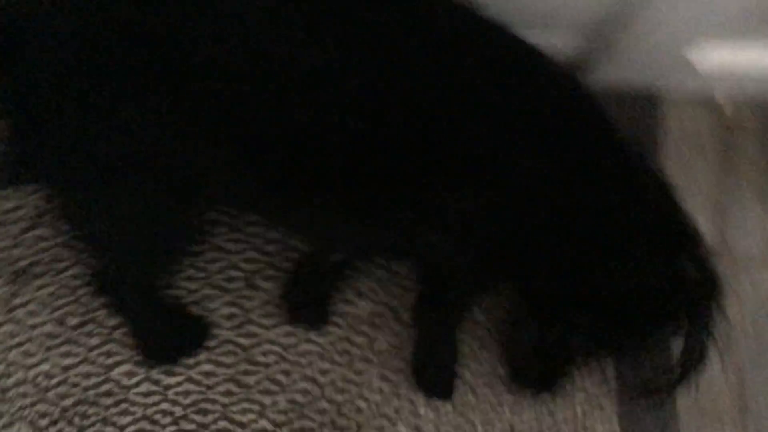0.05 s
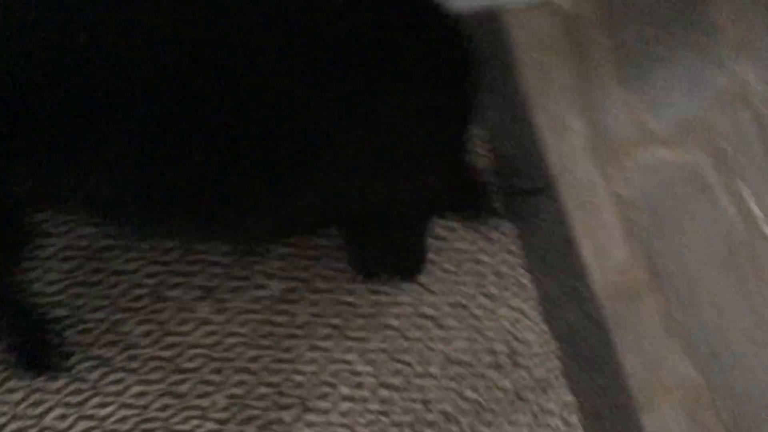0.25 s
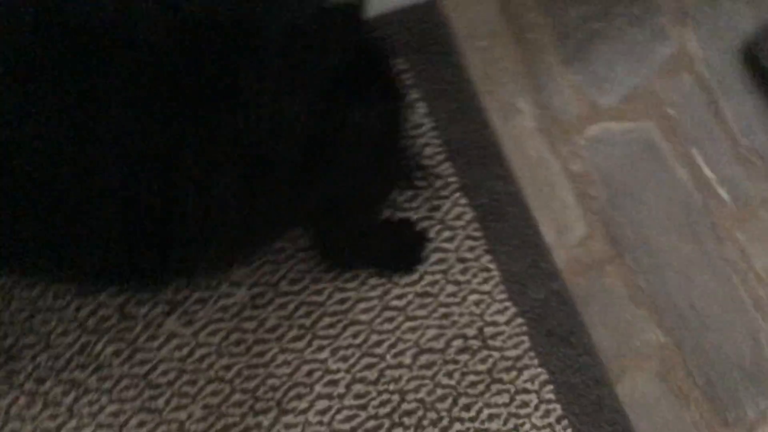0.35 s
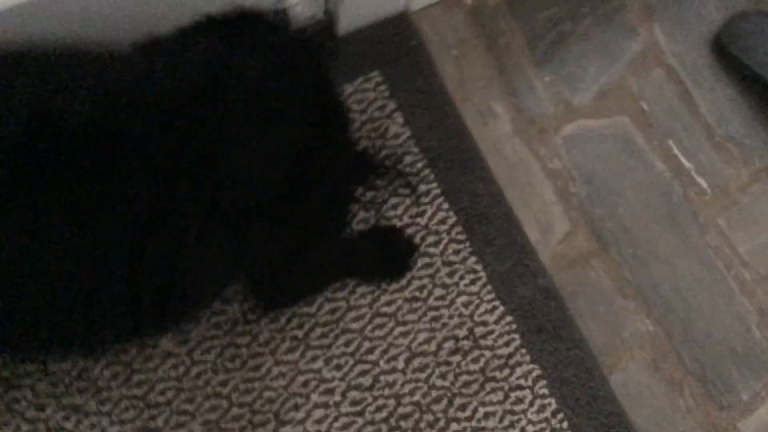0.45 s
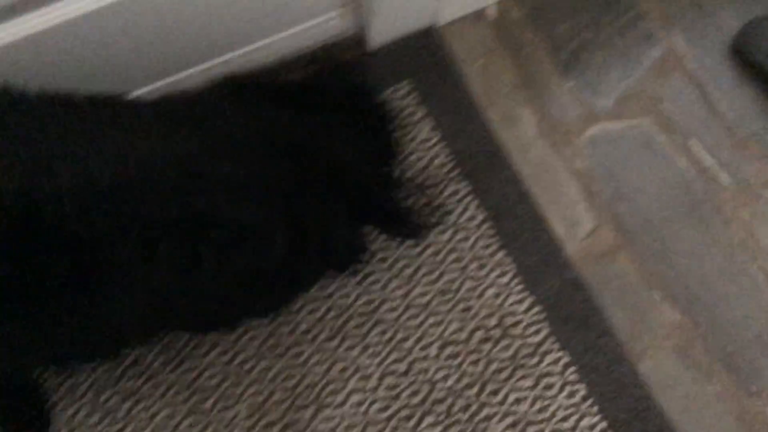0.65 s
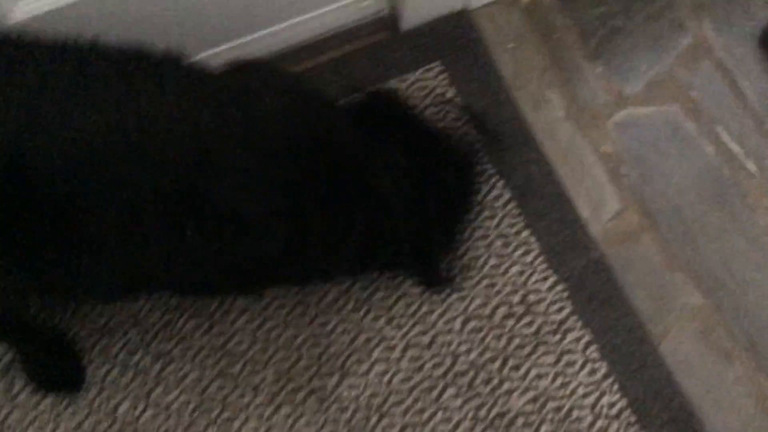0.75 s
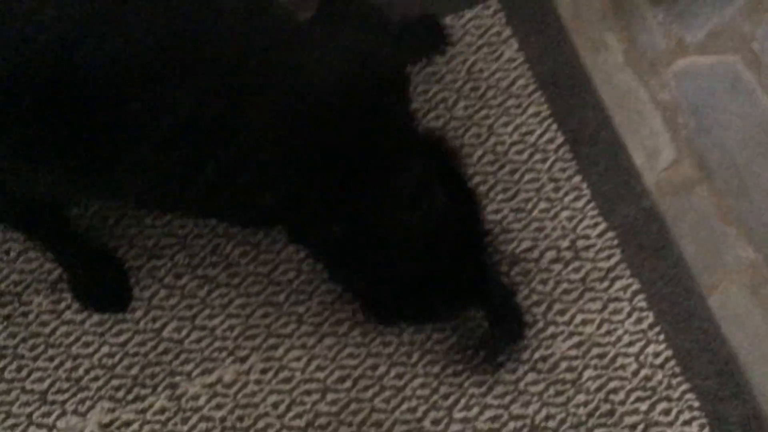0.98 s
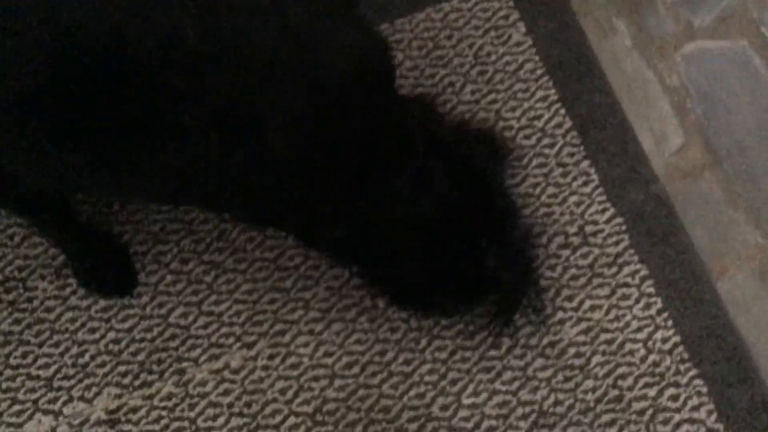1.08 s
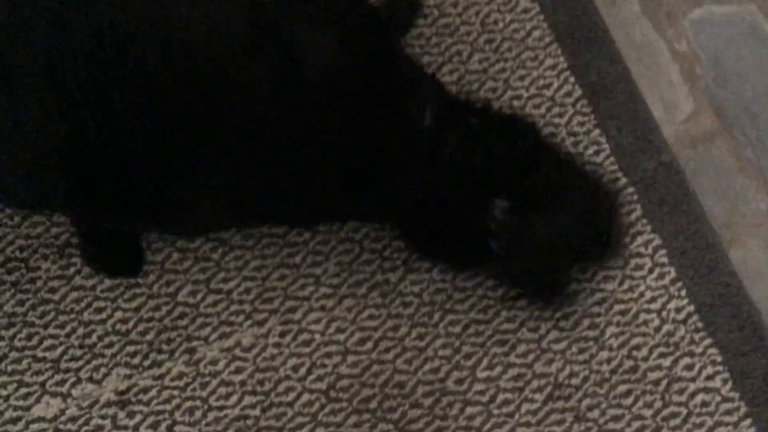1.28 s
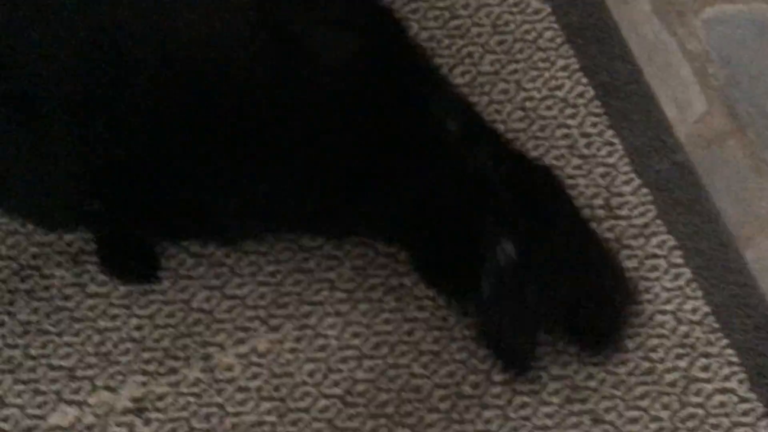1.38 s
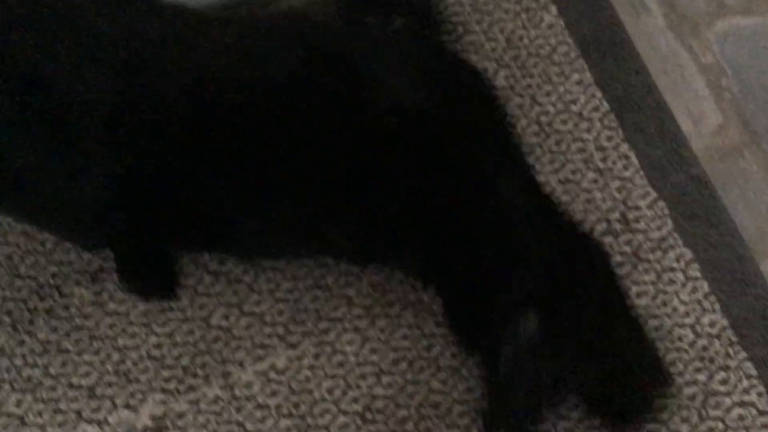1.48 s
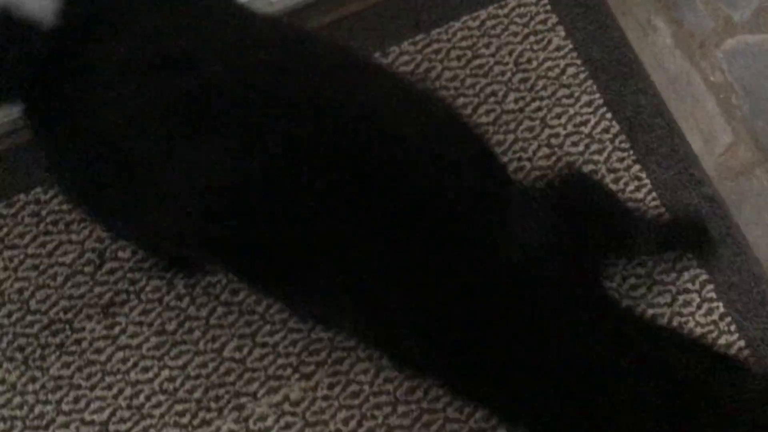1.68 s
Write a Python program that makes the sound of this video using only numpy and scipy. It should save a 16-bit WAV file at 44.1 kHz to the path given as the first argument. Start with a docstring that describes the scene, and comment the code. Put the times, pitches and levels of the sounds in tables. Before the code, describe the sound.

A wet dog rolls and rubs on a rug, thumping the floor once and snorting twice

```python
"""A small hard-walled room with a rug: a wet dog throws itself about on it. It knocks against a door or cabinet
with a hollow thump: decaying noise for the knock, decaying sines for the ringing wood. The coat drags and the
body rolls as filtered random clicks; claws catch as short snaps. It blows air through its nose and snorts
twice: shaped grains, with a noise pop opening each snort. Paws fall softly, wet fur swishes and one tick sounds
in narrow noise bands, over a low, hissy room noise."""
import sys
import numpy as np
from scipy import signal
from scipy.io import wavfile

SR = 44100
rng = np.random.default_rng(int(sys.argv[2]) if len(sys.argv) > 2 else 0)


def generate_wav(signal):
    """Clip the signal to [-1, 1] and save it as 16-bit WAV at the path in sys.argv[1]."""
    frames = np.transpose(np.atleast_2d(signal))
    scaled = np.clip(frames, -1, 1) * 32767
    pcm = np.round(scaled).astype(np.int16)
    wavfile.write(sys.argv[1], SR, pcm)


N = 74970
T = np.arange(N) / SR

# Room noise floor. Each row: frequency in Hz, relative level in dB.
QUIET_SPECTRUM = [(25, -33), (45, -11), (68, 13.5), (100, 2), (170, 0.5), (400, -11.5), (1000, -22.5),
                  (2400, -7), (3300, -15), (5300, -8.5), (7500, -28.5), (11000, -34), (16000, -34.5)]
# Early reflections. Each row: delay in seconds, gain before the source's own early factor.
ECHOES = [(.0024, .7), (.0052, 0.25), (.0087, 0.74), (.0112, .35), (0.0115, .7), (.0166, 0.79),
          (.019, 0.26)]
# Room decay. Each row: frequency in Hz, t60 in seconds.
ROOM_T60 = [(80, 1), (250, 0.74), (1000, 0.49), (2500, .42), (5000, 0.38), (9000, 0.38), (16000, 0.2)]
# Swishes of wet fur, and a last brief tick.
# Each row: start in seconds, length in seconds, level in dB, centre in Hz, glide in Hz/s.
SWISHES_AND_TICK = [(0.261, 0.013, -49.5, 5520, -5), (0.359, .17, -58, 5530, 1504),
                    (0.595, 0.057, -64.5, 5240, -5), (1.4505, 0.0036, -40.5, 3897, -7)]
# Soft falls of paws and shoulder. Each row: start in seconds, level in dB before doubling, pitch in Hz.
PADS = [(0.105, -52, 68), (0.214, -38.5, 68), (1.153, -44, 126.2), (1.332, -45.5, 84.6),
        (1.463, -45.5, 184.5)]
# Paws scuffing the pile. Each row: start in seconds, level in dB, centre in Hz, fade in seconds.
SCUFFS = [(0.379, -50.5, 556, 0.0075), (0.483, -57, 760, 0.024), (0.787, -46.5, 790, 0.017),
          (0.951, -48, 463, 0.014), (1.164, -50, 639, 0.0089), (1.323, -50.5, 660, 0.028)]
# Coat dragged over the rug. Each row: time in seconds, level in dB.
RUB_LEVEL = [(0, -66.5), (.21, -72), (.25, -53), (.33, -63.5), (.38, -63), (.44, -71), (.495, -57.5),
             (.56, -86), (.65, -68), (.72, -55.5), (.76, -55), (.805, -54), (.85, -64), (.93, -67),
             (.96, -52), (1.05, -62.5), (1.12, -53.5), (1.165, -53), (1.25, -67), (1.7, -68.5)]
# Fur on weave. Each row: frequency in Hz, relative level in dB.
COAT_SPECTRUM = [(100, -26), (300, -3.5), (500, -0.5), (750, 1), (1050, -1.5), (1500, -0.5), (2400, 2.5),
                 (3300, -9), (5500, -4.5), (7300, -27), (9000, -18), (11500, -43), (16000, -47)]
# Weight rolling over the boards. Each row: time in seconds, level in dB.
ROLL_LEVEL = [(0, -72.5), (.2, -74), (.27, -64), (.38, -53), (.48, -56.5), (.6, -70.5), (.68, -61.5),
              (.745, -49), (.82, -55.5), (.9, -81), (.98, -65), (1.07, -66), (1.17, -50), (1.26, -92),
              (1.34, -54), (1.43, -69.5), (1.49, -63), (1.56, -64), (1.7, -72.5)]
# Rolling body. Each row: frequency in Hz, relative level in dB.
RUMBLE_SPECTRUM = [(60, -21.5), (120, -6.5), (175, -0.5), (230, 0), (300, -6.5), (365, -5), (480, -22.5),
                   (900, -16.5), (3000, -67)]
# Claws catching the weave. Each row: start in seconds, level in dB, treble shelf in dB, fade in seconds.
CLAWS = [(0.0517, -47, 4, 0.0015), (0.1343, -49.5, -2.5, 0.0014), (0.282, -46, 9, 0.0012),
         (0.7335, -33.5, 7, 0.00045), (0.7365, -40, 1, 0.0012), (0.7418, -44, 4, 0.00066),
         (0.757, -38.5, 9, 0.00034), (0.7615, -36.5, -7, 0.00049), (0.7672, -34.5, -5, 0.0018),
         (0.789, -36, -8.5, 0.0004), (0.793, -32, -9, 0.00036), (0.802, -38.5, -27, 0.00067),
         (0.9513, -42.5, 0, 0.0017)]
# Claw snap. Each row: frequency in Hz, relative level in dB.
CLAW_SPECTRUM = [(100, -33), (300, -4.5), (900, 2), (1400, 1.5), (2200, 5), (3200, -5), (5500, 2.5),
                 (7200, -17), (9000, -32), (11000, -30), (16000, -42)]
# Air blown through the nose. Each row: time in seconds, level in dB.
BLOW_LEVEL = [(.92, -93), (.955, -62), (1.03, -56.5), (1.07, -50.5), (1.13, -61.5), (1.18, -59),
              (1.25, -79), (1.3, -68)]
# Blown air. Each row: frequency in Hz, relative level in dB.
AIR_SPECTRUM = [(300, -4), (1500, -22), (2400, 0.5), (3400, -8), (5200, 5.5), (6100, -0.5), (7200, -14.5),
                (9000, -4), (11500, -17), (14500, -11), (16000, -14)]
# Snorts: nostrils pop open, a jet follows.
# Each row: start in seconds, pop level in dB, jet level in dB, jet fade in seconds, tilt in dB/octave.
SNORTS = [(1.1417, -29.5, -37.5, 0.011, 0.1), (1.3106, -24, -32, 0.023, -0.5)]
# Droplets out of the last snort. Each row: start in seconds, level in dB.
SPLUTTER = [(1.3259, -29), (1.3512, -32)]
# Hiss trailing the last snort. Each row: time in seconds, level in dB.
TRAIL_LEVEL = [(1.31, -62.5), (1.34, -73), (1.39, -56.5), (1.41, -41.5), (1.44, -58), (1.473, -46),
               (1.495, -77), (1.6, -66.5)]
# Wet nose. Each row: frequency in Hz, relative level in dB.
NOSE_SPECTRUM = [(80, -9), (300, -16.5), (700, -16), (1050, -22), (1600, -12.5), (1900, -2), (2400, -7),
                 (2900, -11), (3900, -7), (4400, -2), (5100, 2), (5450, -0.5), (6000, -1.5), (7000, -18),
                 (8700, -17), (11000, -24.5), (16000, -26.5)]
# Thump and its rebound. Each row: start in seconds, level in dB re KNOCK_DB.
THUMPS = [(0.1989, 1), (0.2012, 1.5), (0.2087, -1.5), (0.2132, -10), (0.242, -12)]
# Knock. Each row: frequency in Hz, relative level in dB.
KNOCK_SPECTRUM = [(40, -36), (100, -6), (270, 1.5), (410, 0), (510, -6), (720, -11.5), (950, -14),
                  (1450, -15), (1800, -12.5), (2200, -9.5), (3100, -33), (5000, -23.5), (7000, -48),
                  (16000, -67)]
# Modes of the struck door or cabinet and room low end. Each row: frequency in Hz, level in dB re RING_DB, t60
# in seconds.
KNOCK_MODES = [(70, -34, .16), (121.7, -8.5, 0.29), (146.3, -6.5, 0.36), (169.5, -1.5, 0.22),
               (210.5, -4, 0.24), (262, 4.5, 0.12), (327, -6, 0.1), (354.7, -2, 0.23), (433, -6.5, 0.06),
               (558, -13, 0.21), (723, -10, 0.112)]

QUIET_DB = -63
SWISH_WIDTH_HZ = 840
PAD_RISE_S, PAD_FADE_S = 0.012, 0.015
SCUFF_DB_PER_OCTAVE = 10
TREBLE_HZ = 3200
CLAW_CLICK = 2.15  # first sample, re the rasp's 1
POP_S, SPLUTTER_S = 0.00079, 0.00077
KNOCK_DB, KNOCK_S = -25, 0.0029
RING_DB, RING_RISE_S = -27.5, 0.0032
LOW_CUT_HZ, EDGE_HZ = 48, 16200


def amp(db):
    """Decibels to gain."""
    return 10 ** (np.asarray(db) / 20)


def unit(x):
    """Scales to rms 1."""
    return x / np.sqrt(np.mean(x ** 2) + 1e-20)


def read(points, hz):
    """Interpolates a table on a log-frequency axis."""
    f, value = np.transpose(points)
    return np.interp(np.log(hz + 1), np.log(f), value)


def level(points):
    """Gain along a level curve, -120 dB outside it."""
    return amp(np.interp(T, *np.transpose(points), left=-120, right=-120))


def colour(x, points, extra_db=lambda hz: 0, size=4096):
    """Minimum-phase filter of unit energy with the given spectrum."""
    hz = abs(np.fft.fftfreq(size, 1 / SR))
    log_gain = np.log(amp(read(points, hz) + extra_db(hz)))
    min_phase = np.exp(np.conj(signal.hilbert(log_gain)))
    taps = np.fft.ifft(min_phase).real[:size // 2]
    return signal.fftconvolve(x, taps / np.linalg.norm(taps))[:N]


def fade(start_s, fade_s):
    """Sudden start and exponential decay."""
    return (T >= start_s) * np.exp(-np.maximum(T - start_s, 0) / fade_s)


def burst(start_s, fade_s):
    """Random-sign noise under a fade: a dense spray of tiny impacts."""
    return fade(start_s, fade_s) * rng.choice([-1., 1.], N)


def grains(per_s, spread_db):
    """Random clicks at rms 1; spread_db sets how uneven their sizes are."""
    size = amp(spread_db * np.minimum(rng.exponential(1, N), 4))
    sign = rng.choice([-1., 1.], N)
    hit = rng.random(N) < per_s / SR
    return unit(size * sign * hit)


def room(x, early, wet_db):
    """Direct sound, near surfaces, and a diffuse tail dying by band."""
    hz, t, noise = signal.stft(rng.standard_normal(SR), SR, nperseg=256)
    decay = amp(-60 * t / read(ROOM_T60, hz)[:, None])
    tail = signal.istft(noise * decay, SR, nperseg=256)[1][:SR]
    tail *= 1 - np.exp(-(T[:SR] / 0.004) ** 2)  # soft onset
    response = amp(wet_db) * tail / np.linalg.norm(tail)
    response[0] += 1
    for delay_s, gain in ECHOES:
        response[round(delay_s * SR)] += early * gain
    return signal.fftconvolve(x, response)[:N]


def quiet():
    """Steady room noise: strong lows and a faint hiss."""
    return amp(QUIET_DB) * colour(rng.standard_normal(N), QUIET_SPECTRUM)


def swishes_and_tick():
    """Wet fur sliding, and one short tick, as narrow noise bands with gliding centres."""
    out = np.zeros(N)
    lowpass = signal.butter(2, SWISH_WIDTH_HZ / 2, fs=SR)
    for start_s, length_s, db, centre_hz, glide_hz_per_s in SWISHES_AND_TICK:
        place = np.clip((T - start_s) / length_s, 0, 1)
        hz = centre_hz + glide_hz_per_s * length_s * (place - .5)
        turns = np.cumsum(hz) / SR
        noise = rng.standard_normal(N) + 1j * rng.standard_normal(N)
        wander = signal.lfilter(*lowpass, noise)
        band = unit((wander * np.exp(2j * np.pi * turns)).real)
        out += amp(db) * band * np.sin(np.pi * place)
    return room(out, early=0.067, wet_db=-6)


def pads():
    """Dull pushes on the rug: soft-rising, quickly fading low sines."""
    out = np.zeros(N)
    for start_s, db, hz in PADS:
        age_s = np.maximum(T - start_s, 0)
        shape = (1 - np.exp(-age_s / PAD_RISE_S)) * fade(start_s, PAD_FADE_S)
        out += 2 * amp(db) * shape * np.sin(2 * np.pi * hz * age_s)
    return out


def scuffs():
    """Paws on the pile: short, dull puffs of grains around a centre frequency."""
    out = np.zeros(N)
    for start_s, db, centre_hz, fade_s in SCUFFS:
        hump_db = lambda hz: -SCUFF_DB_PER_OCTAVE * abs(np.log2((hz + 1) / centre_hz))
        puff = fade(start_s, fade_s) * grains(per_s=4500, spread_db=1.5)
        out += amp(db) * colour(puff, COAT_SPECTRUM, hump_db)
    return room(out, early=0.033, wet_db=-4.5)


def coat():
    """Grainy friction of fur on the weave, over the dull rumble of the rolling body."""
    scratch = colour(grains(per_s=2600, spread_db=0) * level(RUB_LEVEL), COAT_SPECTRUM)
    rumble = colour(grains(per_s=1100, spread_db=3.5) * level(ROLL_LEVEL), RUMBLE_SPECTRUM)
    return room(scratch + rumble, early=0.051, wet_db=-14)


def claws():
    """Claws letting go of the threads: a clean click and a short rasp each."""
    shelf = lambda hz: hz ** 4 / (hz ** 4 + TREBLE_HZ ** 4)
    out = np.zeros(N)
    for start_s, db, treble_db, fade_s in CLAWS:
        snap = burst(start_s, fade_s)
        snap[round(start_s * SR)] = CLAW_CLICK
        out += amp(db) * colour(snap, CLAW_SPECTRUM, lambda hz: treble_db * shelf(hz))
    return room(out, early=0.086, wet_db=-6.5)


def nose():
    """Wet, spluttering air: a long blow, two snorts and a trailing hiss, all turbulent grains or noise."""
    jet = colour(grains(per_s=6000, spread_db=3) * level(TRAIL_LEVEL), NOSE_SPECTRUM)
    droplets = sum(amp(db) * burst(start_s, SPLUTTER_S) for start_s, db in SPLUTTER)
    jet += colour(droplets, NOSE_SPECTRUM)
    pops = np.zeros(N)
    for start_s, pop_db, jet_db, fade_s, tilt_db in SNORTS:
        tilt = lambda hz: tilt_db * np.log2(hz + 1)
        pops += amp(pop_db) * colour(burst(start_s, POP_S), NOSE_SPECTRUM, tilt)
        puff = fade(start_s, fade_s) * grains(per_s=5000, spread_db=-0.5)
        jet += amp(jet_db) * colour(puff, NOSE_SPECTRUM, tilt)
    blow = colour(grains(per_s=12000, spread_db=3.5) * level(BLOW_LEVEL), AIR_SPECTRUM)
    return room(pops, early=1.0, wet_db=2.5) + room(jet + blow, early=0.2, wet_db=-5.5)


def thump():
    """A hard knock with rebounds; its first hit sets the door or cabinet ringing."""
    hits = sum(amp(db) * burst(start_s, KNOCK_S) for start_s, db in THUMPS)
    knock = amp(KNOCK_DB) * colour(hits, KNOCK_SPECTRUM)
    age_s = np.maximum(T - THUMPS[0][0], 0)
    ring = np.zeros(N)
    for hz, db, t60_s in KNOCK_MODES:
        ring += amp(db - 60 * age_s / t60_s) * np.sin(2 * np.pi * hz * age_s)
    ring *= amp(RING_DB) * (1 - np.exp(-age_s / RING_RISE_S))
    return room(knock, early=0.05, wet_db=-11.5) + ring


def scene():
    """Sum of all layers, one channel."""
    background = quiet() + swishes_and_tick()
    body = pads() + scuffs() + coat() + claws()
    return (background + body + nose() + thump())[None]


def record(dry):
    """The recorder's low cut and band limit."""
    low_cut = signal.butter(4, LOW_CUT_HZ, "high", fs=SR, output="sos")
    band_limit = signal.firwin(511, EDGE_HZ, window=("kaiser", 9), fs=SR)
    return signal.oaconvolve(signal.sosfilt(low_cut, dry), band_limit[None], "same")


dry = scene()
out = record(dry)
generate_wav(out)
```